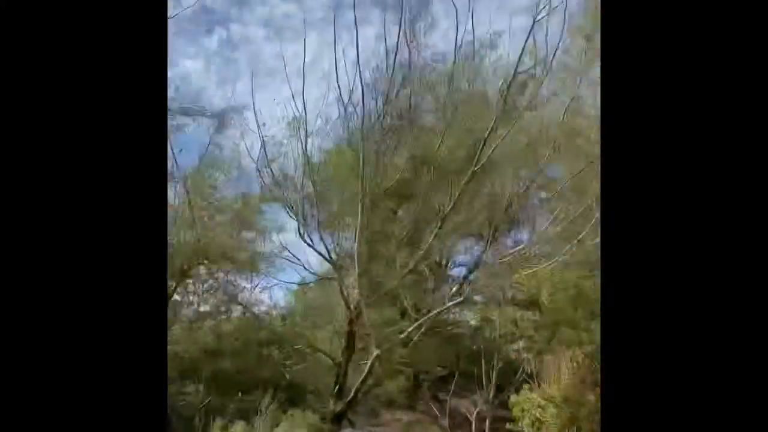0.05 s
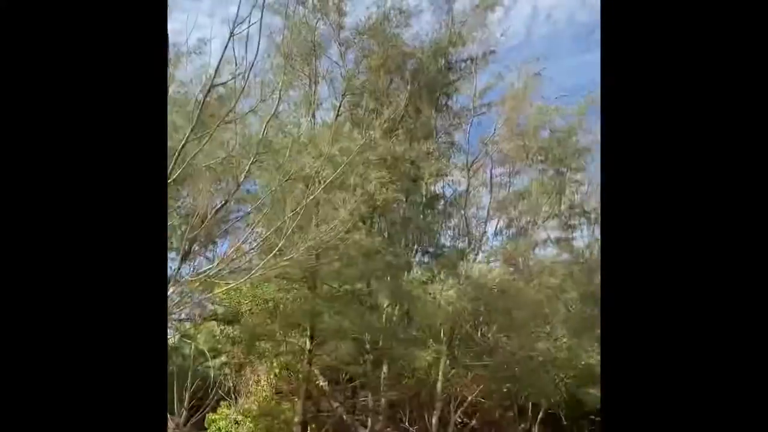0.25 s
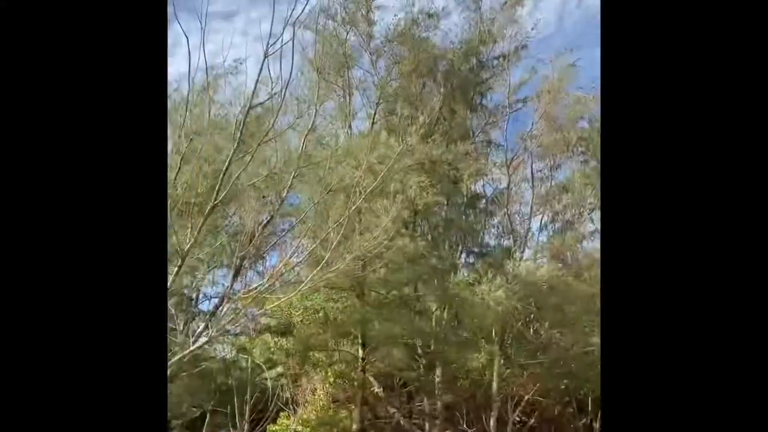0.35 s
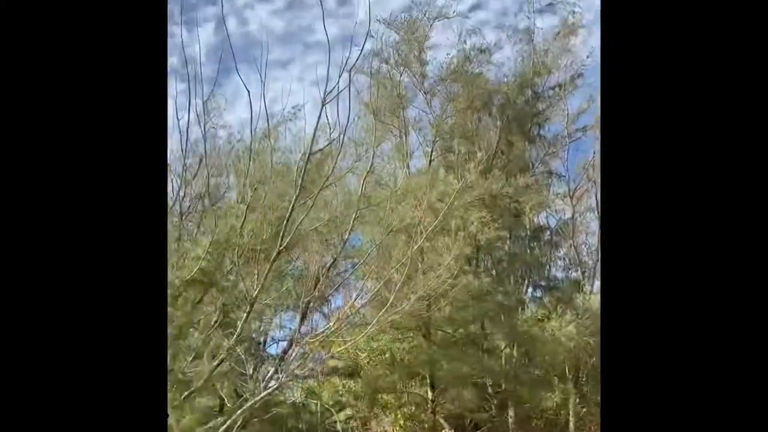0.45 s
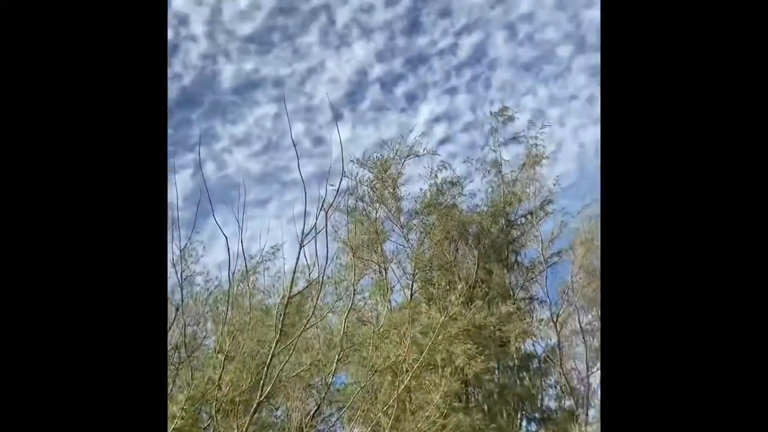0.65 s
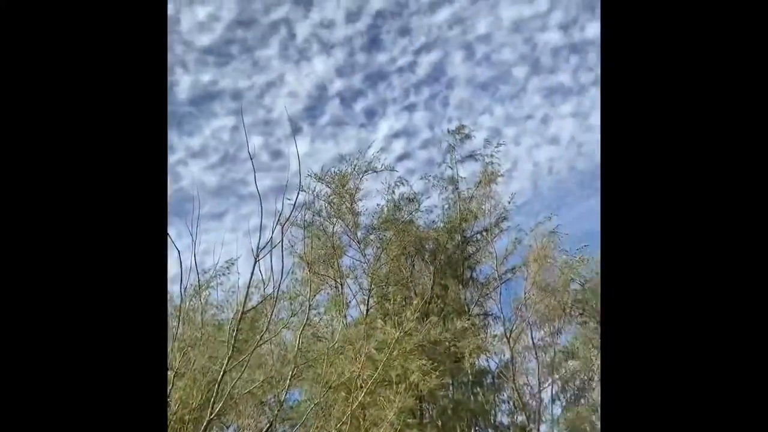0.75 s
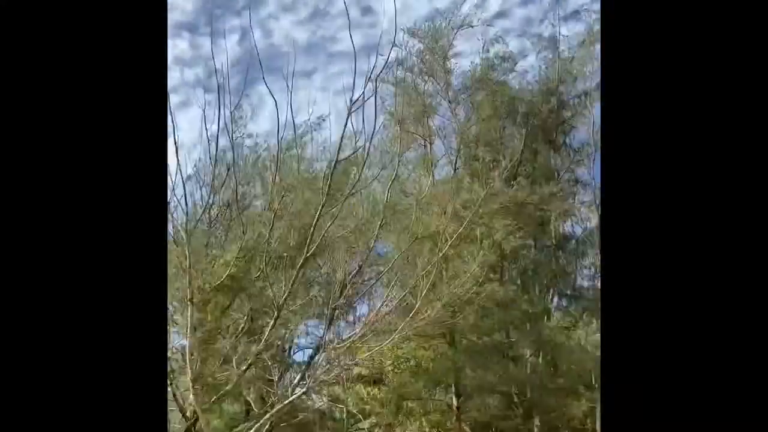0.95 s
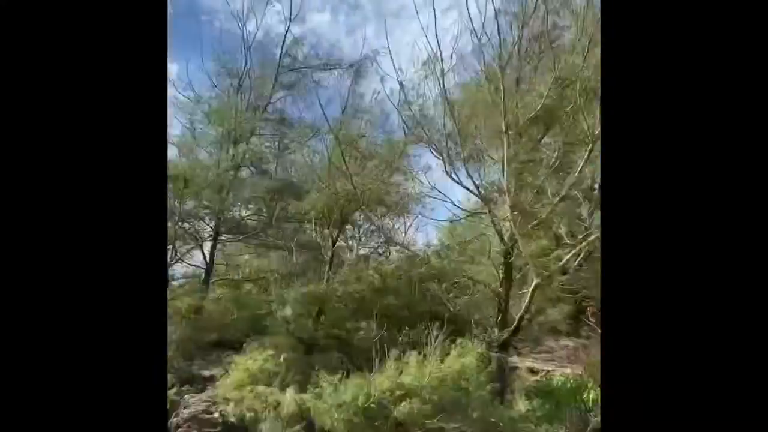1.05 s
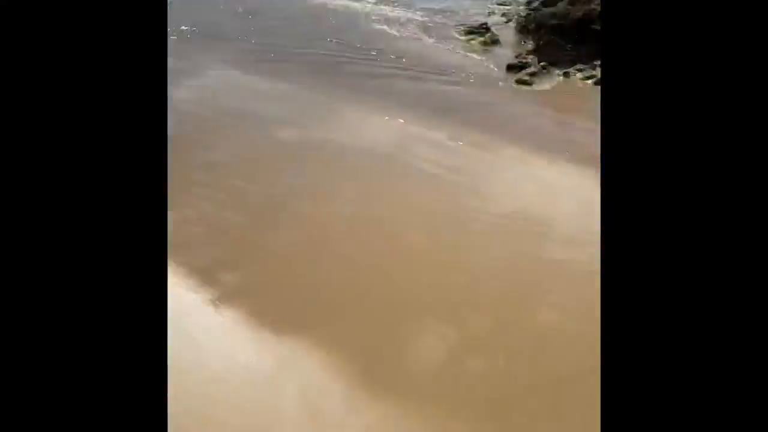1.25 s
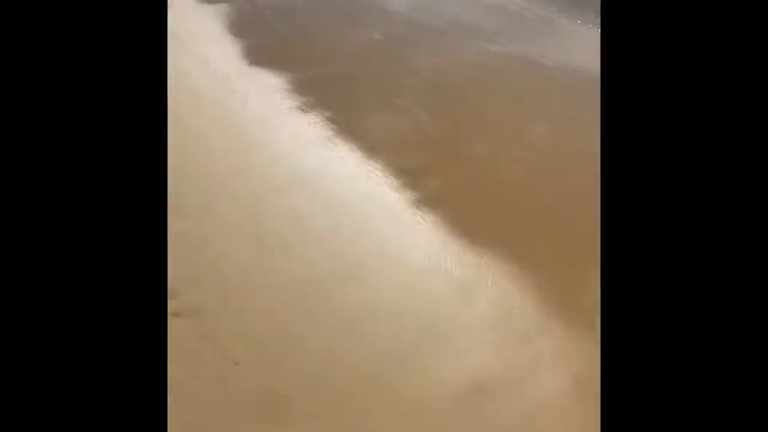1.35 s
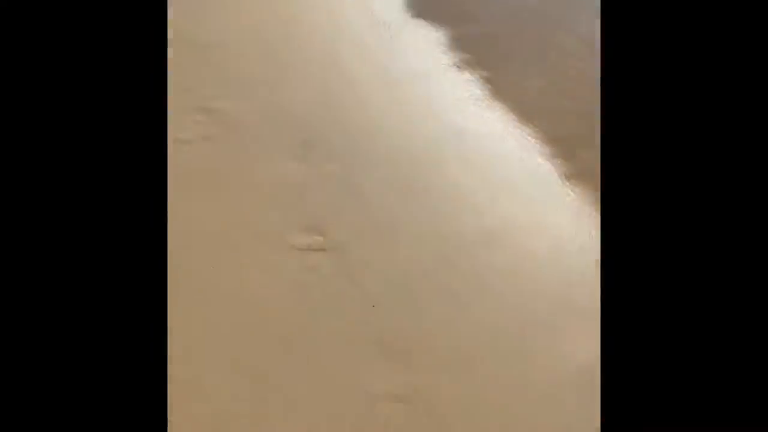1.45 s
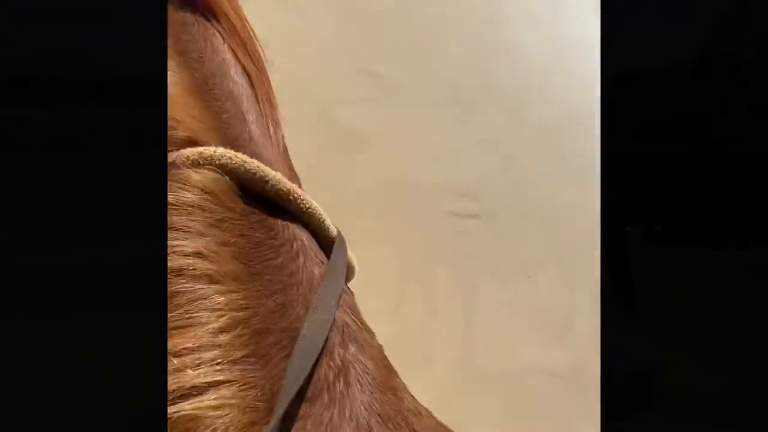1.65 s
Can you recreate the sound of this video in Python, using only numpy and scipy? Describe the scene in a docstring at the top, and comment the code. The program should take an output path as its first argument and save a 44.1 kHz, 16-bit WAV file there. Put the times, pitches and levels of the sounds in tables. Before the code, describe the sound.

Wind buffets the microphone on a beach, one hard rumbling gust and then a shorter one, over the soft hiss of trees. Near the end, shallow water fizzes and a small wave rolls in.

```python
"""Wind on a beach beside feathery trees. First the trees hiss widely all round, over faint water.
Then one hard gust buffets the microphone, brighter the harder it blows, with a low rumble and the thumps
of single eddies (swirls of air). A shorter gust follows. As the microphone swings down to the shore,
the fizz of shallow water comes to the front, and last a small wave rolls in with fine spray."""
import sys
import numpy as np
from scipy import signal
from scipy.fft import rfft, irfft
from scipy.io import wavfile
from scipy.ndimage import uniform_filter1d

SR = 44100
rng = np.random.default_rng(int(sys.argv[2]) if len(sys.argv) > 2 else 0)


def materialize(psi):
    """Save the field psi as 16-bit PCM at rate SR to the path in sys.argv[1].

    A 1-D psi becomes a single channel; in a 2-D psi each row is a channel.
    """
    bounded = np.clip(np.atleast_2d(psi).T, -1, 1)
    quanta = np.round(bounded * 32767).astype(np.int16)
    wavfile.write(sys.argv[1], SR, quanta)


N = 74970

EDGES_HZ = np.geomspace(30, 15000, 25)  # noise is built in 24 bands, low to high
CENTRES_HZ = np.sqrt(EDGES_HZ[1:] * EDGES_HZ[:-1])
EVEN_SAMPLES = int(.025 * SR)  # swells slower than this get evened out


def from_db(db):
    """Turn decibels into a number to multiply a sound by."""
    return 10 ** (np.asarray(db) / 20)


def in_time(rows):
    """Join rows of time_s, value into a curve; the first and last values hold at the ends."""
    return np.interp(np.arange(N) / SR, *np.transpose(rows))


def per_band(rows):
    """Read rows of pitch_hz, value at the centre of every band."""
    hz, value = np.transpose(rows)
    return np.interp(np.log(CENTRES_HZ), np.log(hz), value)


def drift(rate_hz):
    """A smooth random wobble, about 1 in size; a higher rate makes it quicker."""
    keep = np.exp(-2 * np.pi * rate_hz / SR)
    slow = signal.lfilter([1], [1, -2 * keep, keep * keep], rng.standard_normal(N + SR // 2))[-N:]
    return slow / slow.std()


def band_filter(low_hz, high_hz):
    """A filter that lets through what lies between two pitches."""
    return signal.butter(2, [low_hz, high_hz], "band", fs=SR, output="sos")


def panned(sound, left_db):
    """Make the left side left_db louder than the right."""
    return sound * from_db([[left_db / 2], [-left_db / 2]])


def noise_bands(colour, likeness):
    """Stereo noise, band by band. Likeness 1 makes left and right the same, 0 unrelated, -1 opposite."""
    power = from_db(per_band(colour)) ** 2 * np.diff(EDGES_HZ) * (EDGES_HZ[:-1] < colour[-1][0])
    white = rng.standard_normal((2, 2, N + SR // 10))
    alike = np.clip(likeness * np.ones(len(power)), -1, 1)
    for k in np.flatnonzero(power):
        sos = band_filter(*EDGES_HZ[k:k + 2])
        mid, side = signal.sosfilt(sos, signal.sosfilt(sos, white[k % 2]))[:, -N:]
        pair = np.sqrt(1 + alike[k]) * mid + np.sqrt(1 - alike[k]) * np.array([side, -side])
        yield CENTRES_HZ[k], pair * np.sqrt(power[k] / power.sum()) / pair.std()


def rush(levels, colour, likeness, patchy_db):
    """Noise that follows a level curve, each band swelling a little by itself."""
    bands = (band * from_db(patchy_db * drift(rate_hz=10.9)) for _, band in noise_bands(colour, likeness))
    return from_db(in_time(levels)) * sum(bands)


def evened(noise):
    """Take the chance swells out of noise, so that it runs dense and steady."""
    power = np.mean(noise ** 2, axis=0)
    return noise * np.sqrt(power.mean() / uniform_filter1d(power, EVEN_SAMPLES))


def trees():
    """Wind in the fine needles makes a wide hiss, a little to the left."""
    levels = [(0, -40.5), (.17, -40), (.45, -42), (.75, -41.5), (.95, -40.5), (1.12, -39.5), (1.3, -51.5),
              (1.7, -46)]  # loudness of the hiss: time_s, level_db
    colour = [(80, -5), (250, 8.5), (550, -9), (1000, -5), (1900, -3.5), (2800, -5), (3800, -11.5),
              (5000, -7.5), (7000, -13), (10000, -17.5), (13000, -18.5)]  # its strength from low to high: pitch_hz, level_db
    likeness = [(200, 0.91), (550, 0.7), (1100, 0.24), (2000, -0.13), (3500, 0.96), (5500, 0.69),
                (7000, 0.22), (9000, 0.53), (12000, -0.66)]  # how alike the two sides are: pitch_hz, likeness
    lean = [(300, 1), (800, 1.5), (1800, 5.5), (2800, 3), (5500, -0.1), (8000, 1), (10500, .2)]  # how much louder the left is: pitch_hz, left_db
    # the middle pitches of the hiss sink gradually, then return just after one second: time_s, gain_db
    middle_gain = [(0, 2), (.14, -1), (.25, -1), (.7, -3), (.9, -3), (1.1, 1.5), (1.3, 1)]
    bands = noise_bands(colour, per_band(likeness))
    hiss = sum(panned(band, np.interp(hz, *np.transpose(lean))) for hz, band in bands)
    middle = signal.sosfiltfilt(band_filter(400, 2600), hiss)
    left, right = hiss + (from_db(in_time(middle_gain)) - 1) * middle
    lag_s = .00008  # the hiss reaches the right side this much later
    delay = np.exp(-2j * np.pi * np.fft.rfftfreq(N, 1 / SR) * lag_s)
    late_right = irfft(rfft(right) * delay, N)
    return from_db(in_time(levels)) * np.array([left, late_right])


def shallows():
    """Shallow water fizzes on the sand."""
    levels = [(0, -47.5), (.2, -54.5), (.9, -55), (1.05, -47.5), (1.17, -39), (1.235, -39), (1.33, -39),
              (1.5, -40.5), (1.7, -43.5)]  # loudness of the fizz: time_s, level_db
    colour = [(200, -32), (500, -20), (950, -4.5), (1350, 7), (2000, 1.5), (3000, -4), (4300, -1),
              (5800, -11.5), (8000, -15), (10500, -16.5), (13000, -17)]  # its strength from low to high: pitch_hz, level_db
    likeness = [(300, 1), (1400, 0.84), (4200, 1), (5600, 0.4), (7500, 0.7), (10000, .85), (12500, 0.15)]  # how alike the two sides are: pitch_hz, likeness
    return rush(levels, colour, per_band(likeness), patchy_db=0.76)


def waves():
    """Small waves roll in with a hollow rush."""
    levels = [(0, -42), (.1, -43), (.3, -54), (.75, -54.5), (1.0, -66), (1.1, -38.5), (1.23, -78),
              (1.33, -42), (1.46, -40), (1.53, -44), (1.62, -35.5), (1.7, -39.5)]  # loudness of the waves: time_s, level_db
    colour = [(120, -14), (270, -6), (400, 3.5), (530, 6), (750, 0.5), (1100, -10.5), (2200, -23)]  # their strength from low to high: pitch_hz, level_db
    return rush(levels, colour, likeness=1, patchy_db=1.8)


def crosswind():
    """Wind from the side pushes the microphone's two openings in opposite ways."""
    levels = [(0, -73), (.11, -64), (.135, -45), (.17, -51), (.19, -32.5), (.24, -53), (.27, -46),
              (.7, -70), (.88, -51), (.91, -39), (.935, -55), (1.005, -52), (1.02, -34), (1.07, -35.5),
              (1.09, -47), (1.13, -49), (1.172, -26.5), (1.195, -31.5), (1.25, -31.5), (1.32, -38),
              (1.37, -55), (1.7, -62)]  # loudness of the side wind: time_s, level_db
    colour = [(60, -24), (140, 1), (350, 3), (800, -2), (1400, 2.5), (2400, -15), (3600, -19)]  # its strength from low to high: pitch_hz, level_db
    return rush(levels, colour, likeness=-1, patchy_db=3.0)


def eddies():
    """Each eddy thumps the microphone: a smooth pressure swing that dies within a couple of cycles."""
    thumps = [(0.1319, -16, 177), (.2115, -11, 526), (0.2148, -16.5, 140), (.228, -14, 298),
              (0.2426, -2.5, 244), (0.2502, -9, 624), (.276, -7, 427), (.443, -14, 170), (0.527, -24, 204),
              (.563, -17, 194), (.588, -20, 178), (.680, -26.5, 160), (0.704, -26.5, 129),
              (0.762, -30.5, 133), (1.147, -17.5, 284), (1.159, -8.5, 268)]  # one row for each eddy: start_s, level_db, pitch_hz
    out = np.zeros(N)
    for start_s, level_db, pitch_hz in thumps:
        cycles = np.maximum(np.arange(N) / SR - start_s, 0) * pitch_hz
        age = cycles / 0.53  # the swell peaks after about half a cycle
        swell = (age * np.exp(1 - age)) ** 2
        out += from_db(level_db) * np.sin(2 * np.pi * cycles) * swell
    return out


def buffeting():
    """Gusts beat on the microphone: more force brings smaller, brighter eddies in a quick flutter."""
    gusts = np.array([(0, -37.5, -1.5), (0.201, -40, 1.5), (.214, -12.5, -4.5), (0.238, -11, -4.5),
                      (0.252, -9.5, -1.5), (.295, -10, -0.03), (.32, -11, -0.04), (.39, -15, 1.17),
                      (0.408, -28, 6.5), (0.436, -28, -0.4), (.48, -23.5, -2.1), (0.552, -33.5, 3),
                      (0.571, -26.5, 2.85), (.61, -33.5, 1), (.67, -31, -1), (0.701, -43.5, -4),
                      (.85, -50, 4), (1.0, -48.5, 5.5), (1.108, -47.5, -1), (1.122, -22.5, 1.2),
                      (1.139, -25, 0), (1.159, -19.5, -0.5), (1.189, -32, 0.5), (1.22, -42, -1),
                      (1.35, -48, 2), (1.7, -50, 7.5)])  # force of the wind: time_s, level_db, brightness_db_per_octave
    colour = [(35, -35), (60, -40), (85, -12), (125, 2.5), (220, 0.5), (400, -1), (700, -5.5),
              (1100, -11.5), (1600, -24.5), (2300, -33.5), (3300, -54)]  # strength from low to high at full force: pitch_hz, level_db
    likeness = [(60, 1), (150, 1), (360, 0.96), (900, 0.88), (2200, 0.98)]  # how alike the two sides are: pitch_hz, likeness
    full_force_db, brighten_above_hz = -9.5, 153
    force_db = in_time(gusts[:, [0, 1]]) - full_force_db
    brightness_db_per_octave = 0.087 * force_db + in_time(gusts[:, [0, 2]])
    flutter = drift(rate_hz=110)
    flutter -= uniform_filter1d(flutter, EVEN_SAMPLES)  # keep only the quick changes
    flutter = 2 * np.tanh(flutter / 2)  # round off the biggest ones
    out = 0
    for hz, band in noise_bands(colour, per_band(likeness)):
        octaves = max(np.log2(hz / brighten_above_hz), 0)
        flutter_db = (1.5 + 1.35 * octaves) * flutter  # higher bands flutter more
        level_db = -8 + force_db + octaves * brightness_db_per_octave
        out = out + evened(band * from_db(flutter_db)) * from_db(level_db)
    return panned(out, left_db=-0.8)


def rumble():
    """Slow, large eddies make a dull rumble."""
    levels = [(0, -59), (.2, -29.5), (.217, -20.5), (.28, -16.5), (.36, -26), (.45, -37), (.6, -37),
              (.78, -50), (.88, -58), (1.03, -51), (1.11, -54), (1.16, -39), (1.21, -32.5), (1.29, -37.5),
              (1.36, -49), (1.7, -55)]  # loudness of the rumble: time_s, level_db
    colour = [(35, -30), (55, -21), (80, -2), (120, 0.5), (200, -5.5), (300, -9.5), (500, -27.5)]  # its strength from low to high: pitch_hz, level_db
    return rush(levels, colour, likeness=0.93, patchy_db=0.5)


def hollowed(hiss):
    """The hiss turns hollow and wide for a moment, as the middle pitches that both sides share dip."""
    centre_gain = [(1.185, 3.5), (1.215, -12), (1.25, -14), (1.29, -0.5)]  # lift or dip of that shared part: time_s, gain_db
    centre = signal.sosfiltfilt(band_filter(806, 2500), hiss.mean(axis=0))
    return hiss + (from_db(in_time(centre_gain)) - 1) * centre


def spray():
    """Fine spray hisses as the last wave runs up the sand."""
    levels = [(0, -75), (1.45, -63), (1.58, -52), (1.7, -52.5)]  # loudness of the spray: time_s, level_db
    colour = [(4000, -13), (6000, -1), (7300, 0), (9000, -6), (11000, -15)]  # its strength from low to high: pitch_hz, level_db
    return rush(levels, colour, likeness=1, patchy_db=1.0)


def scene():
    """Wind softly overloads the microphone's openings; behind it are the shore and the trees."""
    wind = rumble() + crosswind() + buffeting() + eddies()
    overload = 0.92  # peaks are squashed to stay below this
    wind = wind / (1 + (wind / overload) ** 4) ** (1 / 4)
    # trim the deepest bass and the overload's sharp crackle, keeping the wind dull
    wind = signal.sosfilt(band_filter(60, 2700), wind)
    return wind + hollowed(shallows() + waves() + spray() + trees())


def record(dry):
    """Cut away the very highest treble."""
    cutoff_hz = 12500
    return signal.sosfilt(signal.ellip(10, .2, 80, cutoff_hz, fs=SR, output="sos"), dry)


dry = scene()
out = record(dry)
materialize(out)
```